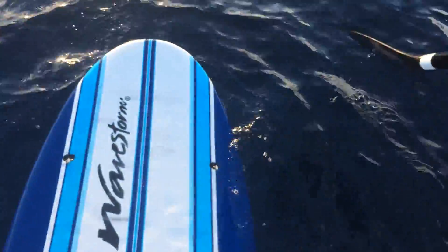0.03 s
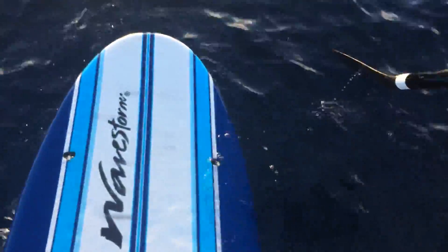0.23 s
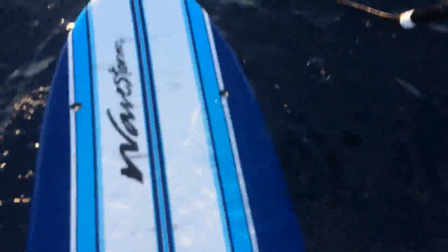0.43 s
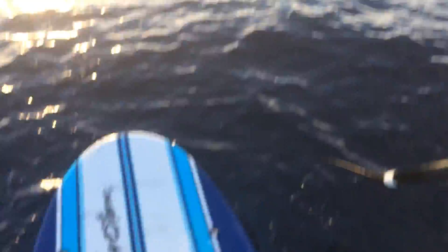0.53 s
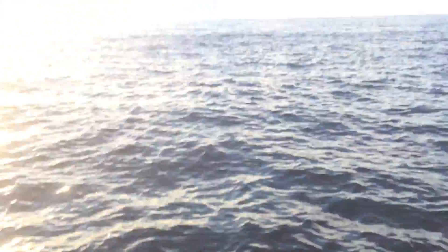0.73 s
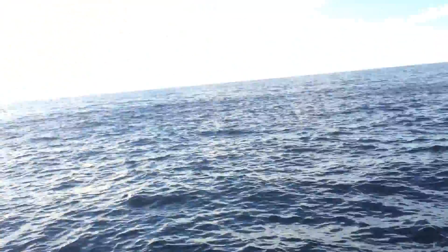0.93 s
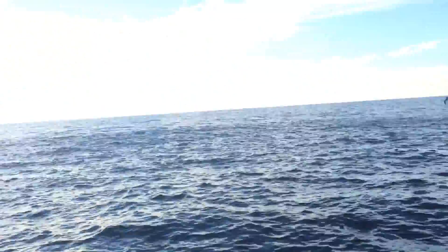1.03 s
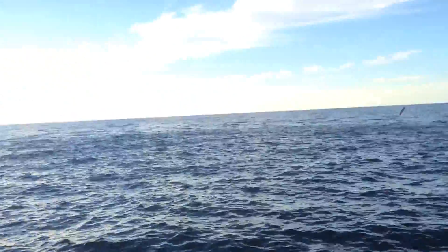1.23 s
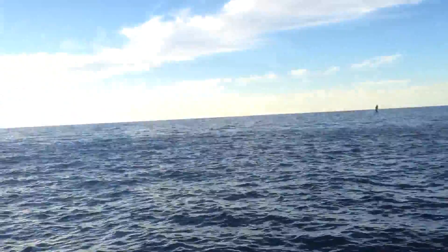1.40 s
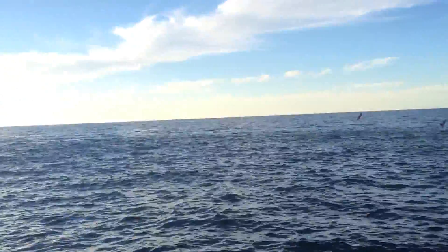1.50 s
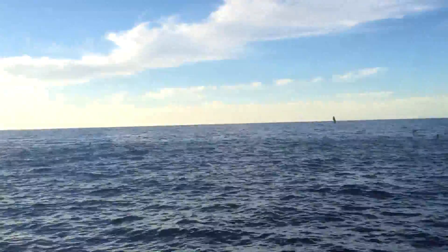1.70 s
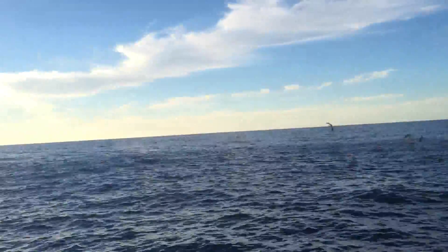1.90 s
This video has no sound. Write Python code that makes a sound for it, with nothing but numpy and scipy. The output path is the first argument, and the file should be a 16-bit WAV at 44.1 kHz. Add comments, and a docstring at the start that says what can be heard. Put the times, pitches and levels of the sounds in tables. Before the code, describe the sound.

A dull handling knock and light finger rustles over faint wind and sea water.

```python
"""A dull knock as the grip slips on a hand-held camera: a pressure step that the microphone slowly lets go. As
the camera is turned, the fingers rustle and bump on it and its case ticks and gives two tiny creaks, all built
from small jumps in pressure. Behind them lies a faint, even wash of wind and water on the open sea, made of
shaped noise."""
import sys
import numpy as np
from scipy import signal
from scipy.fft import rfft, irfft
from scipy.io import wavfile
from scipy.ndimage import uniform_filter1d

SR = 44100
rng = np.random.default_rng(int(sys.argv[2]) if len(sys.argv) > 2 else 0)


def master(y):
    """Save y as 16-bit WAV."""
    cut = np.clip(np.atleast_2d(y).T, -1, 1)
    pcm = np.round(cut * 32767)  # scale
    wavfile.write(sys.argv[1], SR, pcm.astype(np.int16))


N = 85995

# the slip of the grip: t/s, level/dB
GRIP_KNOCK = (.2047, -20)
# flex of the case building up to the knock: time constant/s, share of the step
CASE_FLEX = [(.00035, 0.19), (.004, 0.23)]
# soft bumps of the hand: t/s, level/dB
HAND_BUMPS = [(.111, -43.5), (.455, -48.5), (0.723, -49.5), (0.832, -47.5), (0.906, -51), (1.666, -45.5),
              (1.714, -42), (1.743, -52), (1.818, -48)]
# finger rustles, and one bright creak of the case at 0.792 s: t/s, length/s, top slip level/dB, brightness f/Hz
GRIP_RUSTLES = [(.005, 0.033, -54.5, 250), (0.204, 0.0034, -40, 3000), (.208, .042, -54, 50),
                (.25, 0.037, -59.5, 200), (0.452, 0.018, -59, 151), (0.644, .015, -60, 170),
                (0.725, .005, -50.5, 200), (0.792, .009, -49, 1500), (0.802, .01, -54.5, 700),
                (0.871, 0.02, -59, 1200), (1.012, 0.0054, -45, 3500), (1.032, .003, -49, 800),
                (1.657, .04, -62, 80), (1.717, 0.013, -51, 400), (1.766, 0.011, -55, 400),
                (1.805, 0.013, -50, 300), (1.858, 0.026, -54, 500)]
# clear ticks of the case: t/s, level/dB
CASE_TICKS = [(.235, -50), (1.0374, -40), (1.045, -45), (1.049, -42), (1.107, -46.5), (1.434, -43.5),
              (1.497, -45), (1.616, -48), (1.80, -47), (1.884, -40.5)]
# a second, pitched creak of the case, earlier: t/s, length/s, slip rate/Hz, level/dB
CASE_CREAK = (0.6, 0.03, 637.5, -48)
# tone colour of wind and water: f/Hz, relative level/dB
WASH_SPECTRUM = [(20, 3), (60, -9), (150, -14.5), (300, -18), (600, -23), (1200, -25), (2500, -28.5),
                 (5000, -32), (10000, -34.5), (15000, -36)]
# gentle swell of the wash: t/s, relative level/dB
WASH_SWELL = [(0, 1), (.18, -1.5), (.3, 2), (.55, 1), (.9, 1.47), (1.25, 0.13), (1.58, 0.2), (1.75, 1.95),
              (1.95, 1.2)]


def amp(db):
    """Decibels to gain."""
    return 10 ** (np.asarray(db) / 20)


def unit_rms(x):
    """Scales to an rms of one."""
    return x / np.sqrt(np.mean(x ** 2) + 1e-20)


def add(mix, start, sound):
    """Mixes a sound in at a start time in seconds."""
    part = mix[max(round(start * SR), 0):][:len(sound)]
    part += sound[:len(part)]


def relax(kicks, corner_hz):
    """Each kick is a jump in pressure that leaks away, faster for a higher corner."""
    return signal.lfilter([1], [1, -np.exp(-2 * np.pi * corner_hz / SR)], kicks)


def random_kicks(per_s, spread_db):
    """Scattered kicks of either sign and uneven size, capped at a height of one."""
    chance, size, sign = rng.random((3, N))
    level_db = spread_db * (np.minimum(-np.log(size), np.pi) - np.pi)
    return (chance < per_s / SR) * np.sign(sign - .5) * amp(level_db)


def grip_knock(rise_s=.000021, settle_s=.072):
    """The case flexes, then gives: a pressure step that sinks back and undershoots once."""
    start, db = GRIP_KNOCK
    t = (np.arange(N) - round(start * SR)) / SR
    flex = sum(share * np.exp(np.minimum(t, 0) / lead) for lead, share in CASE_FLEX)
    step = 1 - np.exp(-np.maximum(t, 0) / rise_s)
    leak = [1, -1], [1, -np.exp(-1 / (settle_s * SR))]
    sinking = signal.lfilter(*leak, flex + step)
    return amp(db) * signal.lfilter(*leak, sinking)  # the second leak makes the undershoot


def hand_bumps(rise_s=.00038, fall_s=.012):
    """Rounded little pressure steps as the hand shifts its hold."""
    t = np.arange(SR // 2) / SR
    bump = np.exp(-t / fall_s) - np.exp(-t / rise_s)
    out = np.zeros(N)
    for start, db in HAND_BUMPS:
        add(out, start, amp(db) * bump)
    return out


def grip_rustles():
    """Clumps of tiny slips, mostly under the fingers, some dull and some crisp; one bright clump is a creak of
    the case."""
    out = np.zeros(N)
    for start, length, db, brightness_hz in GRIP_RUSTLES:
        slips = random_kicks(per_s=2200, spread_db=2) * (np.arange(N) < length * SR)
        add(out, start, amp(db) * relax(slips[:SR // 10], brightness_hz))
    return out


def case_ticks(stray_db=-52.5):
    """Dry ticks with no ring: a few clear ones among many faint strays."""
    train = amp(stray_db) * random_kicks(per_s=65, spread_db=3.5)
    for start, db in CASE_TICKS:
        add(train, start, amp([db]))
    return relax(train, corner_hz=880)


def case_creak(jitter=.11):
    """A short run of nearly regular slips, fast enough to take on a pitch."""
    start, length, rate, db = CASE_CREAK
    periods = np.cumsum(1 + jitter * rng.standard_normal(64)) - 1
    train = np.zeros(N)
    for delay in periods[periods < length * rate] / rate:
        add(train, start + delay, amp([db]))
    return relax(train, corner_hz=2200)


def sea_wash(level_db=-59, patch_db=1.04, flutter_db=1.2):
    """A soft noise bed of wind and water with drifting patches; its low mids flutter in the wind."""
    frames, hz = N // 128 + 5, np.fft.rfftfreq(512, 1 / SR)
    real, imag, drift = rng.standard_normal((3, frames, len(hz)))
    slow_drift = uniform_filter1d(drift, size=16, axis=0)
    patches = unit_rms(uniform_filter1d(slow_drift, size=10, axis=1))
    flutter = unit_rms(uniform_filter1d(rng.standard_normal(frames), size=7))[:, None]
    low_mids = hz / (hz + 150) / (1 + hz / 900)  # broad hump from 150 to 900 Hz
    spectra = (real + 1j * imag) * amp(patch_db * patches + flutter_db * flutter * low_mids)
    noise = signal.istft(spectra.T, nperseg=512, noverlap=384)[1][:N]
    f, db = np.transpose(WASH_SPECTRUM)
    colour = amp(np.interp(np.log(np.fft.rfftfreq(N, 1 / SR) + 1), np.log(f), db))
    swell_db = np.interp(np.arange(N) / SR, *np.transpose(WASH_SWELL))
    return unit_rms(irfft(rfft(noise) * colour, N)) * amp(level_db + swell_db)


def scene():
    """Handling sounds up front and the sea behind, in mono."""
    crackle = grip_rustles() + case_ticks() + case_creak()
    dulled = signal.lfilter(*signal.butter(1, 8300, fs=SR), crackle)  # the case softens the top end
    return (grip_knock() + hand_bumps() + dulled + sea_wash())[None]


def record(dry):
    """A steep high cut at 15380 Hz takes the very top off the mix."""
    high_cut = signal.firwin(511, 15380, window=("kaiser", 9), fs=SR)
    return signal.oaconvolve(dry, high_cut[None], "same")


dry = scene()
out = record(dry)
master(out)
```